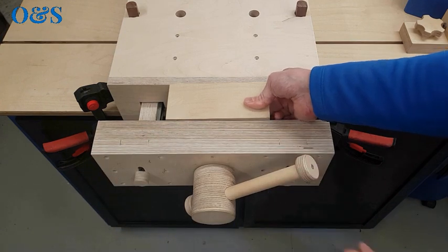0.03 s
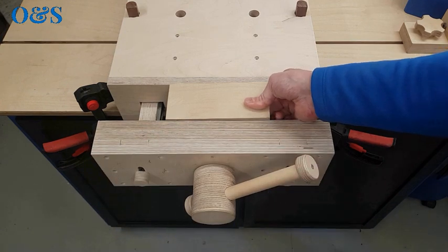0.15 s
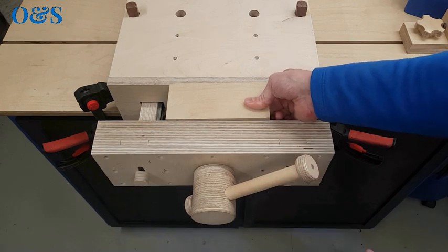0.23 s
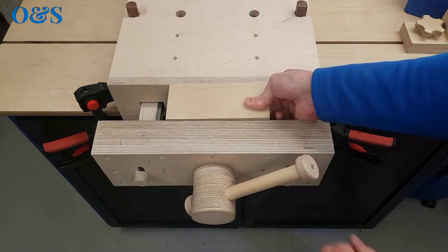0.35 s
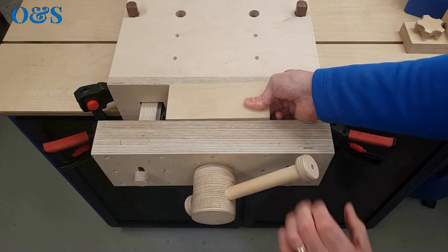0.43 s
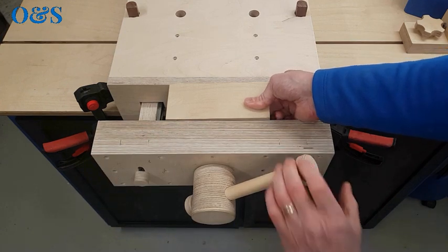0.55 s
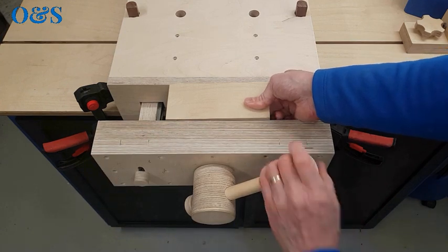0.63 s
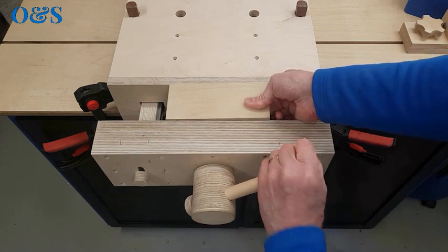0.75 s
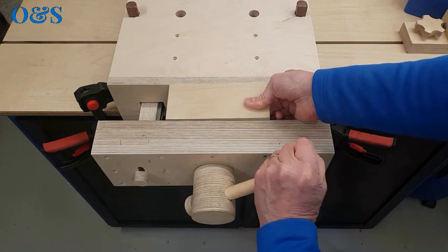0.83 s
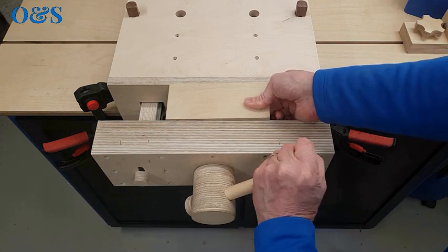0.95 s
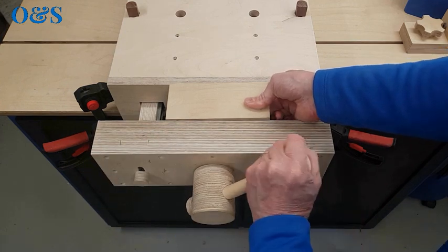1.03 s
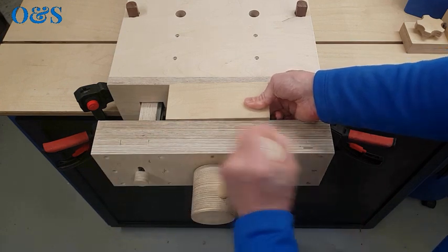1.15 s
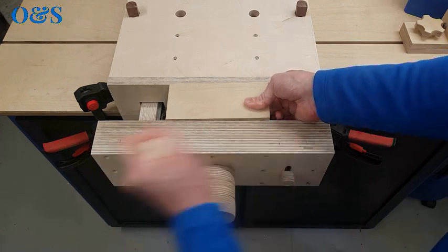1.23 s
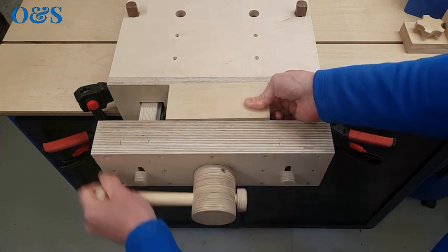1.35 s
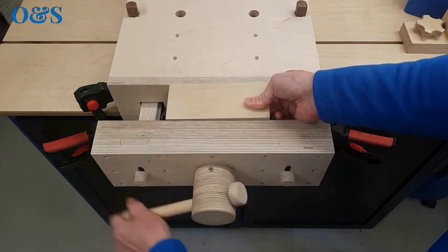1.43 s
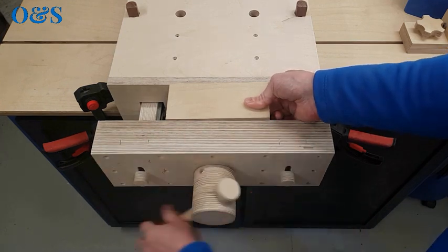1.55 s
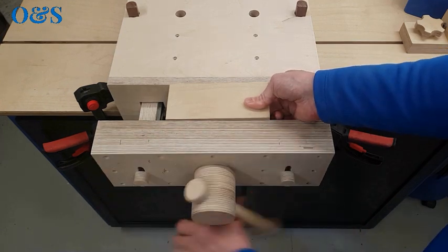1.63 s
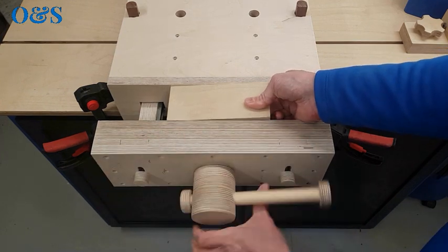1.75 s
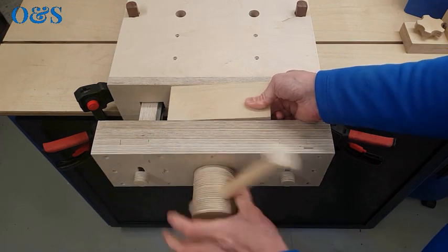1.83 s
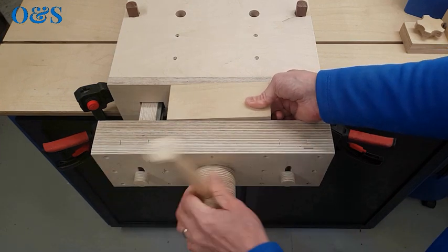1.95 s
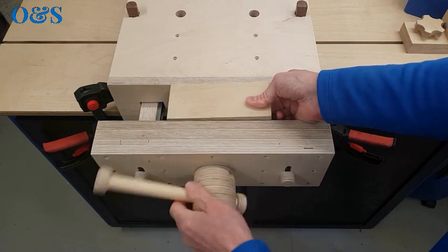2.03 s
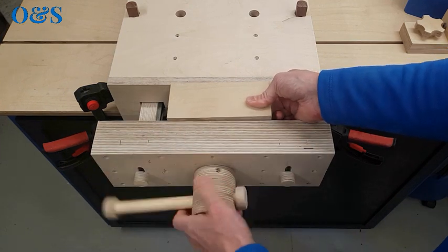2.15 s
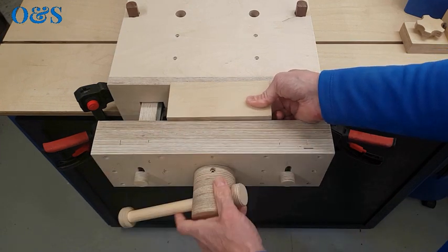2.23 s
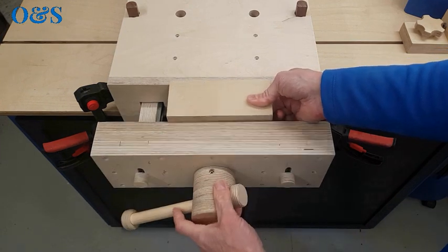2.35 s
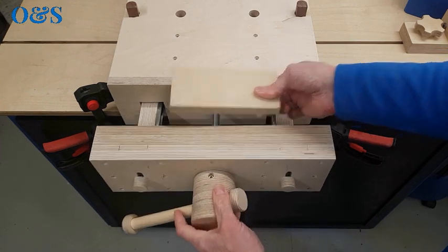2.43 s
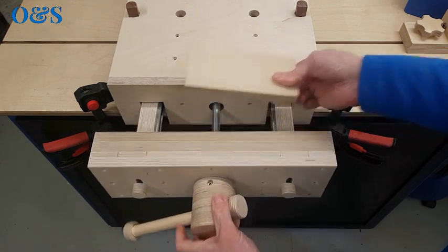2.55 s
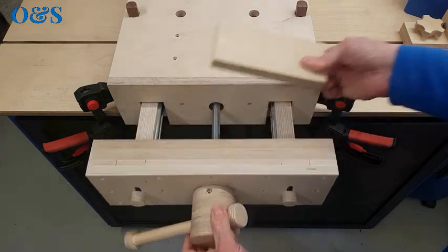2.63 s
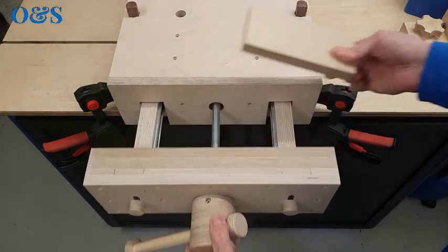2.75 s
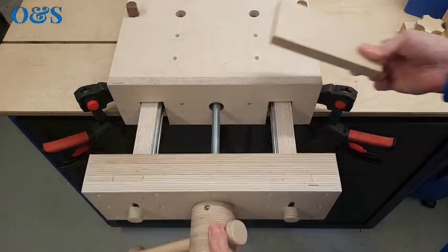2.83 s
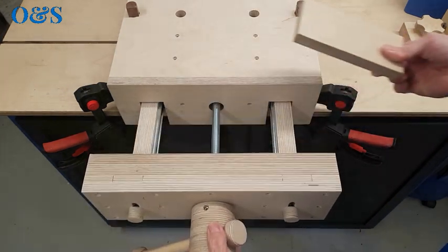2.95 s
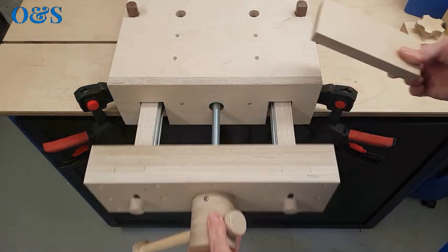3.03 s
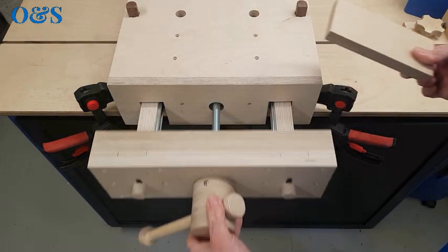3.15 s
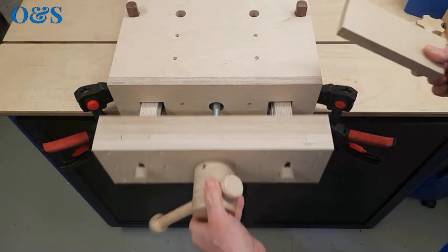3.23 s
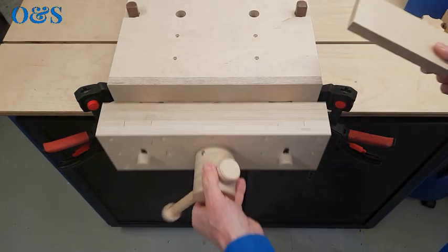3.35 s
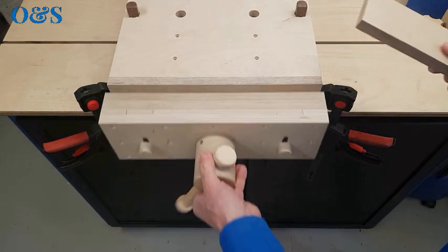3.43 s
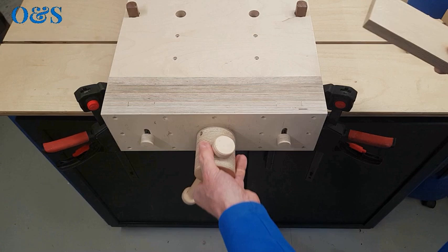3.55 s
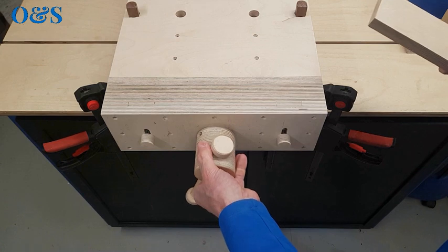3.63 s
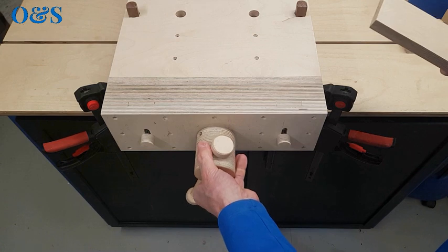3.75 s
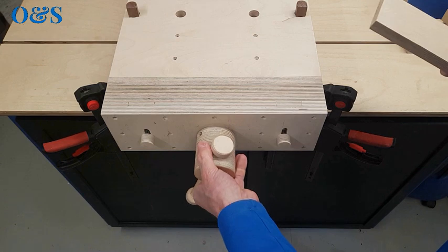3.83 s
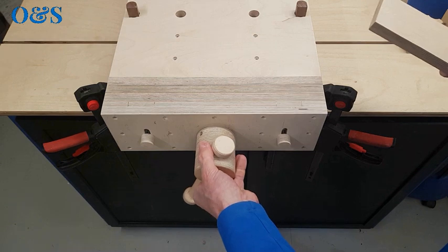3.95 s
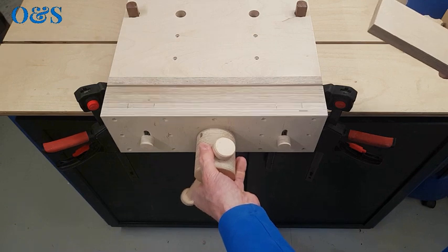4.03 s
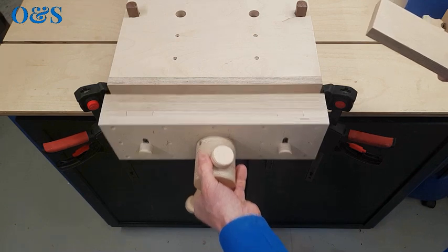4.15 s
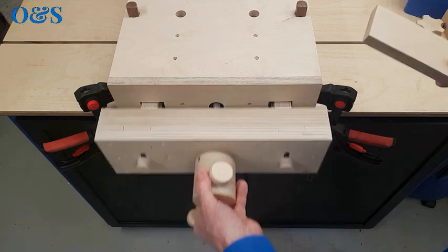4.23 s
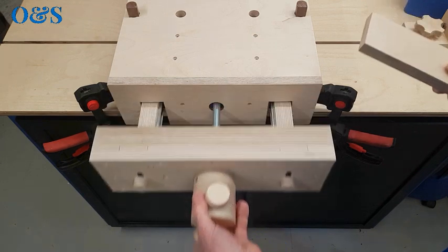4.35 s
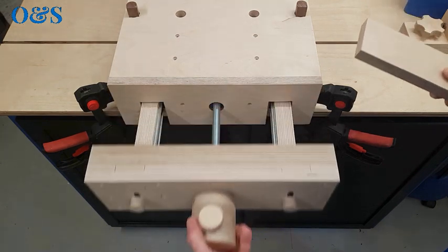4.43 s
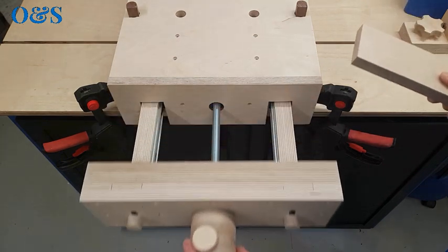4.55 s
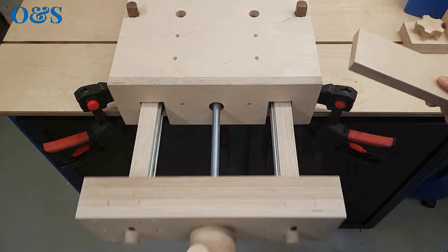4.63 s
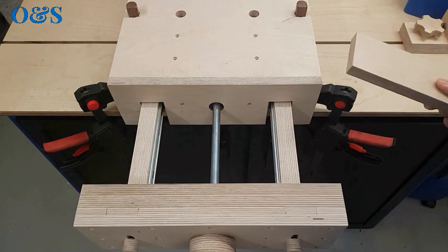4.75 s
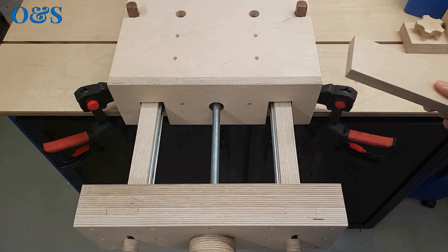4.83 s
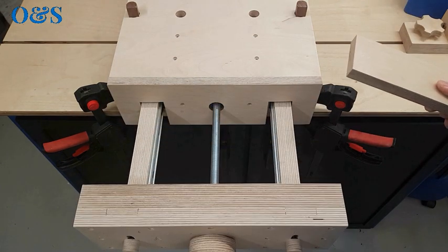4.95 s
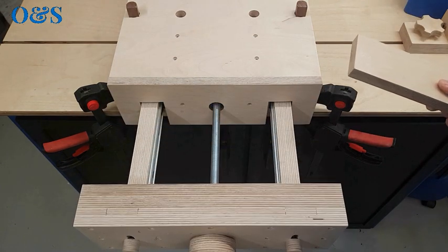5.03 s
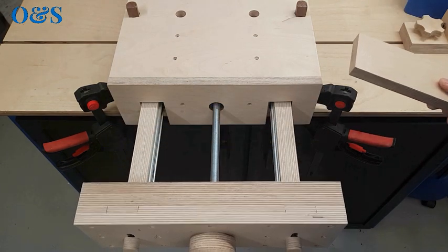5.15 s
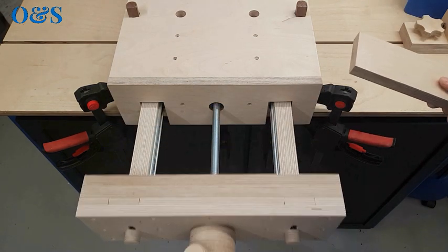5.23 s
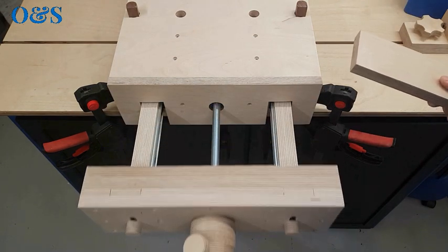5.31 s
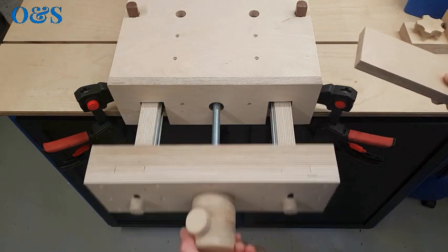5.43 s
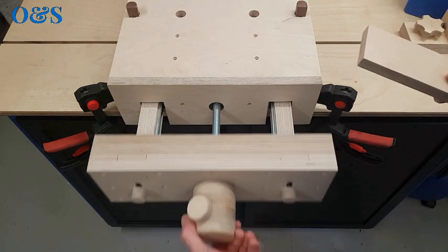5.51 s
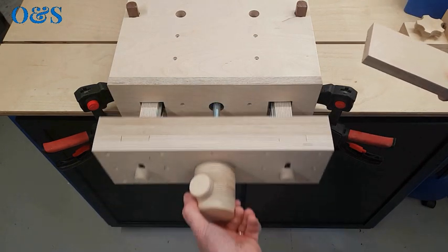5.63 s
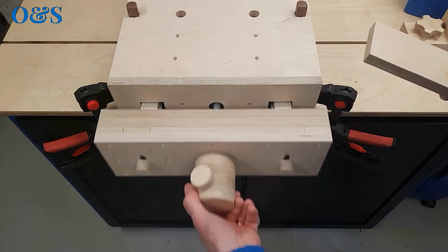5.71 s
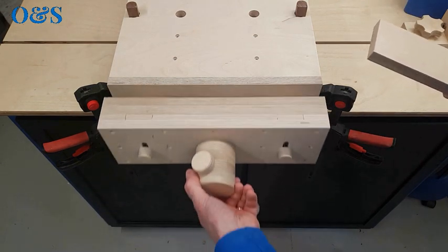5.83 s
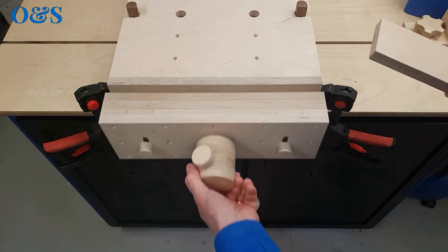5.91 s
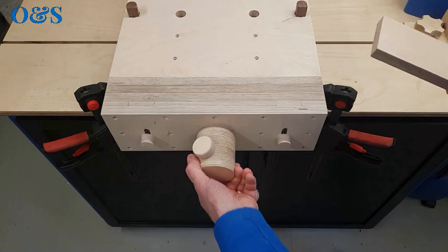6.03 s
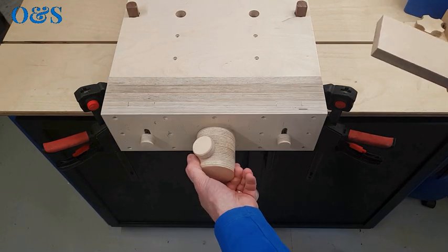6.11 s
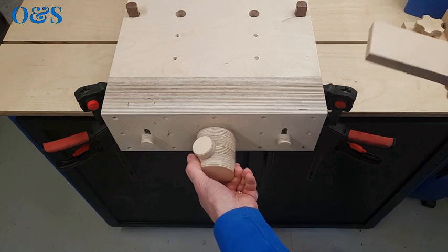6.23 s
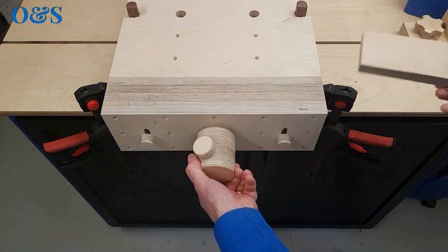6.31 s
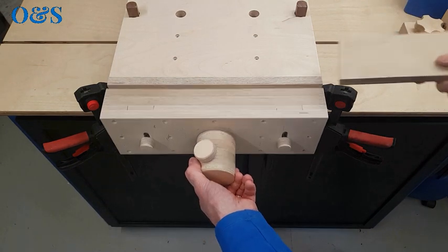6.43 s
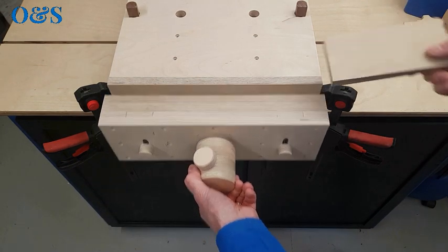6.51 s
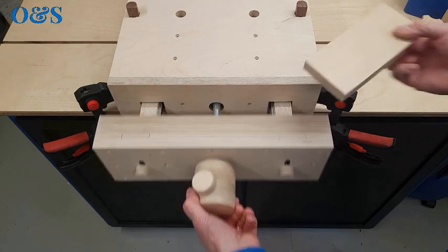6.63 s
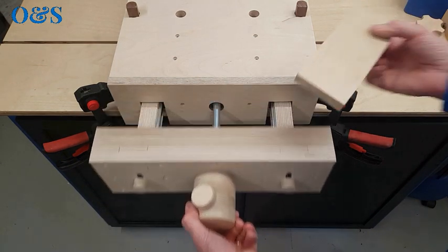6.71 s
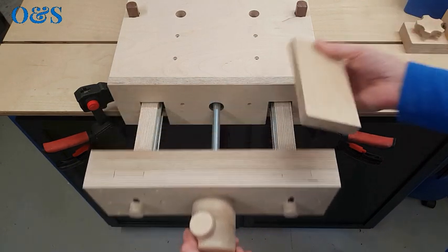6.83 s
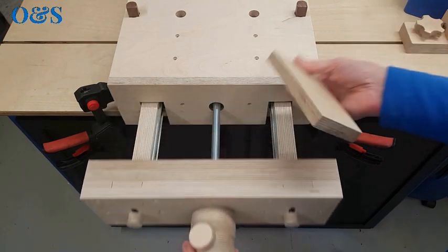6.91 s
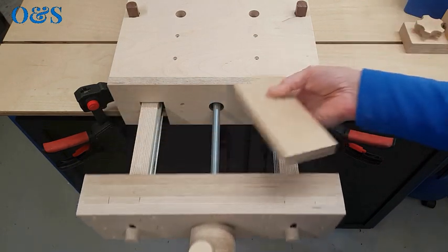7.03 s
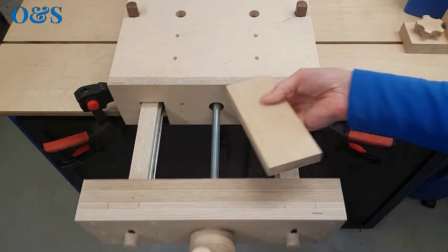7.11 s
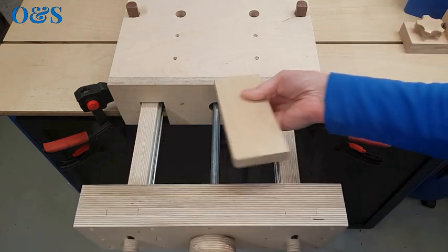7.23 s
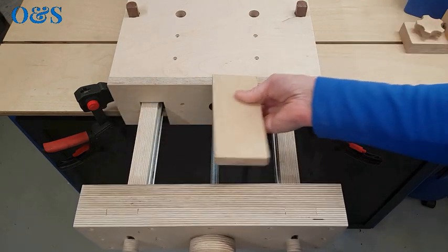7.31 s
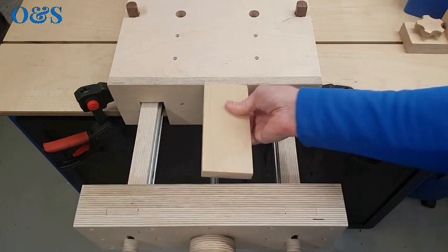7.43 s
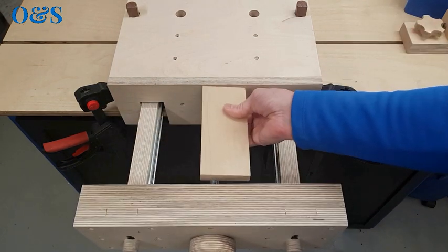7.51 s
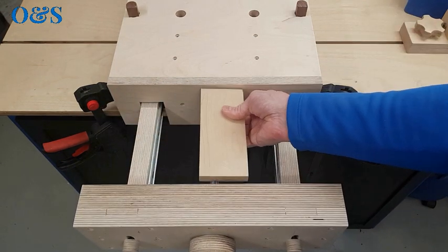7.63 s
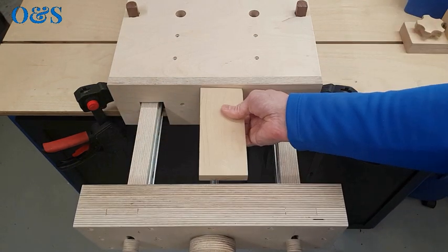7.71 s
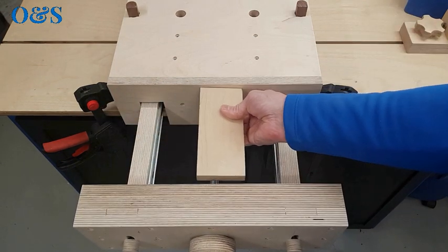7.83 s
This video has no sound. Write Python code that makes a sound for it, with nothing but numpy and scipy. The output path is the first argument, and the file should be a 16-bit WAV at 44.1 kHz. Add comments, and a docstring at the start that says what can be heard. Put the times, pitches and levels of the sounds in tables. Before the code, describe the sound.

Light clatter of a wooden handle, then a vise jaw scraping along wooden rails and clunking against its stops.

```python
"""A quiet workshop, where a plywood bench vise is worked by hand close under a stereo microphone.
The handle rattles round, the jaw bangs against its stops and a block is set down between the jaws:
each impact excites damped modes of the wood. Sliding on its wooden rails, the jaw is driven by
stick-slip friction. The small room reverberates; hands brush, and faint whistles sound over the air."""
import sys
import numpy as np
from scipy import signal
from scipy.fft import rfft, irfft, next_fast_len
from scipy.io import wavfile
from scipy.ndimage import uniform_filter1d

SR = 44100
rng = np.random.default_rng(int(sys.argv[2]) if len(sys.argv) > 2 else 0)


def wrap_up_sound(samples):
    """Save the sound to the file named by the first command line argument, as 16-bit audio."""
    columns = np.atleast_2d(samples).T
    # keep every value between -1 and 1, then stretch to whole-number steps
    tamed = np.clip(columns, -1, 1)
    steps = np.round(tamed * 32767).astype(np.int16)
    wavfile.write(sys.argv[1], SR, steps)


N = 347067

# Normal modes of the vise and bench: frequency_hz, level_db, t60_s
VISE_MODES = [(33.6, -18, 0.18), (56, -16, 0.58), (83.1, -12.5, 0.66), (107, -5.5, 0.17), (104, -9.5, 0.36),
              (160.8, -0.5, 0.094), (265, -1, 0.2), (273.3, -11, 0.24), (354.3, 3.5, 0.18),
              (421.7, 5, 0.082), (517.4, 2.5, 0.029), (603, 3, 0.081), (677, 1.5, 0.08), (670, -2, 0.045),
              (750, -7.5, 0.017), (838, -7, 0.09), (884, -7.5, 0.079), (1080, -26, 0.062),
              (1217, -5.5, 0.076), (1289, -16.5, 0.25), (1640, -25.5, 0.052)]
# Likeness of left and right in the hiss: frequency_hz, coherence
HISS_COHERENCE = [(60, 0.073), (240, 0.21), (950, 0.19), (3770, 0.03), (15000, 1)]
# Strokes of wood on wood; a nearly shut jaw rings lower: scrape_db, rasp_db, rumble_db, from_hz, to_hz,
# glide_middle_s, effort as (time_s, level_db)
STROKES = [(-2, 0.5, -29, 369, 280, 0.34, [(0, -73), (.12, -68), (.22, -82), (.5, -101)]),
           (-0.5, 8.7, 0.5, 314, 380, 1.76, [(1.4, -87), (1.5, -64.5), (1.56, -57), (1.63, -52),
           (1.7, -64.5), (1.82, -99)]), (-6.5, 0.1, -5.5, 324, 335, 2.85, [(2.55, -99), (2.69, -64),
           (2.85, -60.5), (3, -50), (3.13, -54.5), (3.28, -82)]),
           (-6, 0.1, -8.5, 450, 306, 3.44, [(3.28, -75), (3.38, -50), (3.5, -40), (3.66, -45.5),
           (3.77, -46.5), (3.89, -52)]), (-2.5, 0.09, -18, 218, 333, 4.5, [(4.33, -99.5), (4.43, -59.5),
           (4.46, -56.5), (4.53, -45), (4.57, -44.5), (4.65, -44.5), (4.74, -43), (4.89, -52.5),
           (4.96, -56.5), (5.05, -42.5)]), (-7.5, 3, -18.5, 338, 305, 6.18, [(5.25, -79.5), (5.55, -66),
           (5.63, -56.5), (5.69, -52.5), (5.79, -49.5), (5.84, -43.5), (5.875, -50.5), (5.905, -44),
           (5.95, -49), (6.06, -50.5), (6.09, -50.5), (6.27, -65), (6.39, -57.5)]),
           (-7, 0.7, -7.5, 299, 337, 6.99, [(6.68, -86), (6.8, -59), (6.84, -49.5), (6.91, -50.5),
           (6.96, -43.5), (6.99, -51), (7.045, -40), (7.13, -45.5), (7.18, -48.5), (7.25, -51.5),
           (7.3, -52.5), (7.5, -84.5)])]
# Impacts of each kind: start_s, body_db, thud_db, clack_db, crack_db, tick_db, low_note_db,
# upper_notes_db, ring_factor, pan_db. The levels from thud to upper notes are offsets on the body level.
HANDLE_GRIPPED = [(0.84, -45, -7, 10.5, -10, -61, -6, -3, 1, -0.5),
                  (0.98, -53.5, -16, 7.5, -25, -13, -11, -7, 1, -2),
                  (1.075, -52.5, -14, -12, -8, -17, 4, -10, 0.47, 1),
                  (1.132, -50.5, -16, 4, 5, -7, -1, 13.5, 0.31, 0),
                  (1.319, -48.5, -39, -35, -2, -20, -1, -3, 0.65, -1)]
HANDLE_SWUNG = [(1.946, -55.5, -3, -11, -10, -30, 3, -5, 1, 0),
                (2.191, -39.5, -10.5, -7, -7.5, -53, 10, 8.5, 0.76, -1.5),
                (2.303, -56.5, -7.5, -18, 1.5, -55, -14, -10, 0.98, 3),
                (2.431, -42.5, -26, -27, -22, -33, -1, -23, 0.29, -6)]
HANDLE_DROPS = [(2.024, -38.5, -5, -5, -13, -29, 4.6, 4.6, 0.51, 0.86),
                (2.042, -36.5, 1.5, -23, -6.5, -36, 8.2, 1.4, 0.71, 1.8)]
JAW_CATCHES = [(2.86, -49.5, -33, 6, -11.5, -37, -5, -6, 0.91, 1),
               (3.352, -40.5, -19, -14, -33, -48, -11, 3, 0.47, 1),
               (3.508, -36.5, -34, -8, -25, -36, -4, 13, 0.62, -0.56),
               (3.576, -26, -25.5, -6.5, -33, -47, 10, 13, 0.18, 1),
               (3.647, -38, -16, -4, -29, -26, 8, 5.5, 1, 1),
               (4.448, -41, -11.5, 13, -38, -33.5, -16, -5, 0.18, -1.8),
               (4.479, -34, -19, 3, -7.5, -52, -13, -10, 0.67, -1),
               (4.654, -35.5, -15, -1.5, 6, -42, -15, 1, 0.23, .5)]
JAW_SHUTS = [(3.8765, -12, -13, 4, -5, -30, -9.5, -8, 0.38, -0.87),
             (3.883, -9, -8.5, -0.5, -10, -33, 11.5, -2.5, 0.62, -1),
             (6.3718, -22, -38, -2, -2, -19, -9, 6, 0.45, -1.3),
             (6.377, -22, -15.5, 9, -2.5, -26, 10.5, 5, 0.75, -1.1)]
JAW_STOPS = [(5.038, -18, -12.5, -8, -3, -19.5, 12.4, -11, 0.74, -1)]
BLOCK_TAPS = [(7.278, -38, -15.5, -21, -15, -22, 2, -2.9, 0.91, -2),
              (7.395, -37.5, -17, -18.5, -7.5, -28.5, 11, 0.45, 0.69, -1.5)]
BLOCK_LANDS = [(7.532, -11, -12.5, -34, -19.5, -41.5, 6.2, -12.5, 0.67, 0.68)]


def gain_of(db):
    """Amplitude ratio of a level in decibels."""
    return 10 ** (np.asarray(db) / 20)


def unit_rms(x):
    """Normalisation to a mean power of 1."""
    return x / np.sqrt(np.mean(x ** 2) + 1e-20)


def value_at(points, hz):
    """Interpolation of a spectrum on a log-frequency axis."""
    f, value = np.transpose(points)
    return np.interp(np.log(hz + 1), np.log(f + 1), value)


def add(mix, start_s, sound):
    """Superposition of a sound on the mix."""
    part = mix[..., round(start_s * SR):][..., :sound.shape[-1]]
    part += sound[..., :part.shape[-1]]


def sampled(points):
    """Linear interpolation in time: the start and the value at every sample."""
    times, values = np.transpose(points)
    return times[0], np.interp(np.arange(times[0], times[-1], 1 / SR), times, values)


def drift(length, span):
    """Slow fluctuation: a moving average of noise over span samples, at rms 1."""
    return unit_rms(uniform_filter1d(rng.standard_normal(length), span))


def coloured(x, spectrum):
    """Spectral shaping of x, at rms 1."""
    hz = np.fft.rfftfreq(len(x), 1 / SR)
    return unit_rms(irfft(rfft(x) * gain_of(value_at(spectrum, hz)), len(x)))


def resonate(x, hz, width_hz):
    """Resonance of gain 1 by heterodyning: shift hz down to zero, smooth, and shift back."""
    carrier = np.exp(2j * np.pi * np.cumsum(hz * np.ones(len(x))) / SR)
    pole = np.exp(-np.pi * width_hz / SR)
    return 2 * (carrier * signal.lfilter([1 - pole], [1, -pole], x / carrier)).real


def stereo_pair(a, b, coherence):
    """Partial coherence: left and right mixed from two independent spectra."""
    return np.array([a, coherence * a + np.sqrt(1 - coherence ** 2) * b])


def hiss(spectrum, coherence, patchy_db):
    """Random-phase stereo noise whose spectrum fluctuates in drifting patches, at rms 1."""
    frames, hz = N // 256 + 5, np.fft.rfftfreq(1024, 1 / SR)
    a, b, c, d, patches = rng.standard_normal((frames, 513, 5)).T
    patches = unit_rms(uniform_filter1d(uniform_filter1d(patches, 12, 0), 12, 1))
    bands = stereo_pair(a + 1j * b, c + 1j * d, value_at(coherence, hz)[:, None])
    bands *= gain_of(value_at(spectrum, hz)[:, None] + patchy_db * patches)
    return unit_rms(signal.istft(bands, nperseg=1024, noverlap=768)[1][:, :N])


def still_air():
    """Ambient noise floor: steady, broadband and strongest in the bass."""
    # Spectral density of the air: frequency_hz, relative_db
    spectrum = [(15, 3.5), (35, -19), (55, -14.5), (90, -0.5), (250, -9.5), (385, -3), (600, -13),
                (1000, -15.5), (1900, -15), (3000, -21.5), (6500, -31), (10000, -32.5), (15000, -24.5)]
    return gain_of(-67.5) * hiss(spectrum, HISS_COHERENCE, patchy_db=.9)


def whistles():
    """Faint thin tones with random frequency and amplitude modulation."""
    # One pitch contour for each whistle: time_s, pitch_hz
    contours = [
        [(5.262, 4500), (5.285, 4720), (5.34, 4480), (5.365, 4720)],
        [(5.455, 4750), (5.5, 4400), (5.57, 4250), (5.7, 4380), (5.75, 4560), (5.79, 4220), (5.87, 4370),
         (5.91, 4600)],
        [(2.05, 7500), (2.11, 7450)],
        [(2.21, 7550), (2.26, 7500)],
        [(2.5, 7350), (2.58, 7550), (2.7, 7500)],
        [(2.82, 7400), (2.87, 7400)],
        [(7.16, 4750), (7.22, 4700)],
    ]
    mix = np.zeros(N)
    for contour in contours:
        start_s, hz = sampled(contour)
        wavering_hz = uniform_filter1d(hz, 600) + .008 * hz * drift(len(hz), 300)
        tone = np.sin(2 * np.pi * np.cumsum(wavering_hz) / SR)
        level_db = -81.5 - 1.5 * (hz - 4500) / 1000 + 3 * drift(len(hz), 900)
        add(mix, start_s, gain_of(level_db) * tone * signal.windows.tukey(len(hz), .2))
    return mix


def rustle():
    """Amplitude-modulated hiss: brushing hands, the fizz of strokes and treble lingering after knocks."""
    # Spectral density of the rustle: frequency_hz, relative_db
    spectrum = [(1500, -9), (3000, 7.5), (4250, 1), (4650, 6), (5050, -0.5), (6700, -5.5), (7500, 1),
                (8500, -2), (15000, -2.5)]
    # Hands and sleeves brushing: peak_s, level_db, rise_db_per_s, fall_db_per_s
    brushes = [(0.06, -73, 10, 76), (0.891, -69.5, 238, 121), (1.01, -77, 206, 76),
               (1.33, -103, 502.5, 100), (1.619, -62.5, 155, 127), (2.035, -67.5, 515, 152),
               (2.45, -78, 5, 36), (7.17, -69.5, 34, 41)]
    fizz_db, fizz_follows = -54.5, 0.43
    linger_db, linger_db_per_s = -55.5, 67
    t = np.arange(N) / SR
    envelope = sum(gain_of(db - np.where(t < peak_s, rise * (peak_s - t), fall * (t - peak_s)))
                   for peak_s, db, rise, fall in brushes)
    for *_, effort in STROKES:
        start_s, level_db = sampled(effort)
        add(envelope, start_s, gain_of(fizz_db + fizz_follows * level_db))
    for start_s, body_db, *_ in JAW_SHUTS + JAW_STOPS + BLOCK_TAPS + BLOCK_LANDS:
        add(envelope, start_s, gain_of(body_db + linger_db - linger_db_per_s * t[:SR]))
    return envelope * hiss(spectrum, HISS_COHERENCE, patchy_db=1.2)


def room(x):
    """Reverberation: convolution with sparse reflections, each band decaying at its own rate."""
    # Reverberation time: frequency_hz, t60_s
    decay = [(60, 0.61), (250, 0.28), (600, 0.33), (1200, 0.31), (3000, 0.27), (8000, 0.32)]
    # Likeness of the echoes at left and right: frequency_hz, coherence
    coherence = [(100, 0.81), (300, 1), (500, .3), (900, 0.9), (2000, 0.15), (6000, 0.15), (12000, 0.62)]
    build_up_s = .012
    taps = np.zeros((2, SR))
    arrivals = np.arange(150, SR - 20, 20) + rng.integers(0, 20, (2, (SR - 151) // 20))
    np.put_along_axis(taps, arrivals, rng.choice([-1., 1.], arrivals.shape), 1)
    hz, t, bands = signal.stft(taps, SR, nperseg=512)
    envelope = gain_of(-60 * t / value_at(decay, hz)[:, None]) * (1 - np.exp(-(t / build_up_s) ** 2))
    bands = stereo_pair(*bands, value_at(coherence, hz)[:, None]) * envelope
    # Each band takes the energy of its envelope, so no pitch stands out.
    bands *= (np.linalg.norm(envelope, axis=-1) / np.linalg.norm(bands, axis=-1))[..., None]
    bands *= (hz ** 2 / (hz ** 2 + 170 ** 2))[:, None]  # the echoes carry little bass
    tail = signal.istft(bands, SR, nperseg=512)[1]
    return signal.fftconvolve(x[None], tail / np.linalg.norm(tail[0]), axes=1)[:, :N]


def diffused(sound):
    """Diffusion: the walls receive a knock from all sides as a short puff, its notes run together."""
    blur_hz = 220
    power = uniform_filter1d(abs(rfft(sound)) ** 2, round(blur_hz * len(sound) / SR))
    pulse = irfft(np.sqrt(power), len(sound))
    return np.roll(pulse, 400)[:800] * np.hanning(800)


def microphone_ports(x):
    """Phase difference between the two ports; the lowest bass is filtered out."""
    # Lag of the right port behind the left: frequency_hz, phase_rad
    lag = [(300, 0.14), (1100, 1.33), (2100, 1.19), (2600, -0.5), (3500, -0.5), (4300, 6), (5500, 5),
           (5900, -15), (7000, 6.5)]
    size = next_fast_len(N)
    rotation = np.exp(-1j * value_at(lag, np.fft.rfftfreq(size, 1 / SR)) * [[0], [1]])
    high_passed = signal.sosfilt(signal.butter(2, 38, "high", fs=SR, output="sos"), x)
    return irfft(rfft(high_passed, size) * rotation, size)[:, :N]


def stroke(scrape_db, rasp_db, rumble_db, from_hz, to_hz, glide_middle_s, effort):
    """Stick-slip friction: uneven slips and fine grain drive the jaw's resonance and the vise's modes."""
    # Spectral density of wood dragged over wood: frequency_hz, relative_db
    spectrum = [(250, -37), (420, 3), (590, -3), (850, -10.5), (1180, -10.5), (1700, -15), (2600, -23),
                (3300, -32.5), (5000, -39.5), (9000, -58)]
    slips_per_s, glide_s, judder_db, scrape_follows = 220, 0.03, 2.5, 0.78
    start_s, level_db = sampled(effort)
    length, peak_db = len(level_db), level_db.max()
    t = start_s + np.arange(length) / SR
    swell_db = level_db - peak_db + judder_db * drift(length, 1500)  # the grip is uneven
    jaw_hz = from_hz + (to_hz - from_hz) / (1 + np.exp((glide_middle_s - t) / glide_s))
    slipping = rng.random(length) < slips_per_s / SR
    slip_size = gain_of(4.2 * np.minimum(rng.exponential(1, length), 3))
    grain = rng.standard_normal(length)
    force = 0.51 * unit_rms(slipping * slip_size * np.sign(grain)) + 0.87 * grain
    jaw = resonate(resonate(force, jaw_hz, 36), jaw_hz, 120)
    bench_top = resonate(resonate(force, 277.3, 37), 274.3, 170)
    coupling = 1.6 * np.exp((272 - jaw_hz) / 60)  # the lower the jaw rings, the more it drives the bench
    drag = coloured(force, [(f, db + value_at([(600, 0), (2200, rasp_db)], f)) for f, db in spectrum])
    scrape = drag + 0.17 * sum(resonate(drag, hz, 11 / t60) for hz, _, t60 in VISE_MODES if hz > 450)
    rumble = sum(gain_of(db) * resonate(resonate(force, hz, 5 / t60), hz, 70) * np.sqrt(t60)
                 for hz, db, t60 in VISE_MODES if hz < 210)
    sound = (gain_of(swell_db) * unit_rms(jaw + coupling * bench_top)
             + gain_of(scrape_db + scrape_follows * swell_db) * unit_rms(scrape)
             + gain_of(rumble_db + swell_db) * unit_rms(rumble))
    return start_s, gain_of(peak_db) * sound * signal.windows.tukey(length, .05)


def knock(body_db, thud_db, clack_db, crack_db, tick_db, low_db, upper_db, ring_factor, pan_db,
          rise_ms, note_t60_s, looseness, low_hz, upper_notes):
    """Impact excitation: damped modes of the vise and its pieces swell and decay over a dry crack."""
    # Centres of thud, body, clack and crack: frequency_hz
    colour_hz = [120, 310, 800, 2500]
    # Plywood modes crowded into a dry noise: frequency_hz, relative_db
    dense_modes = [(250, -26.5), (450, 0.5), (700, -4), (1000, -4), (1600, -8.5), (2300, -16),
                   (3200, -20.5), (5000, -24.5), (8000, -33.5), (15000, -56)]
    t = np.arange(SR // 2) / SR
    mode_hz, mode_db, mode_t60 = np.transpose(VISE_MODES)[:, :, None]
    notes = [(low_hz, low_db)] + [(f, level + upper_db) for f, level in upper_notes]
    note_hz, note_db = np.transpose(notes)[:, :, None]
    colour = list(zip(colour_hz, [thud_db + 15, 0, clack_db, crack_db]))
    hz = np.vstack([mode_hz, note_hz])
    db = np.vstack([mode_db + value_at(colour, mode_hz), note_db])
    t60 = ring_factor * np.vstack([mode_t60, note_t60_s * (600 / note_hz) ** 0.11])
    # Loose parts keep chattering, so each mode wanders in phase, the high ones most.
    walk = np.cumsum(rng.standard_normal((len(hz), len(t) // 32 + 1)), axis=1)
    chatter = uniform_filter1d(walk.repeat(32, axis=1)[:, :len(t)], 64)
    phase = 2 * np.pi * (hz * t + rng.random((len(hz), 1))) + looseness / 1000 * hz * chatter
    swell = 1 - np.exp(-(t * 1000 / (rise_ms + 600 / hz)) ** 0.9)  # heavy parts start more slowly
    ringing = (gain_of(db - 60 * t / t60) * swell * np.sin(phase)).sum(0)
    hardness = [(2500, 0.0077), (6000, tick_db - crack_db + 10)]  # a harder contact is brighter
    spectrum = [(f, level + value_at(hardness, f)) for f, level in dense_modes]
    noise = coloured(rng.standard_normal(len(t)), spectrum)
    crack = gain_of(crack_db + 6 - 60 * t / (0.12 * ring_factor)) * noise
    contact = 1 - np.exp(-(t * 1000 / (0.8 * rise_ms)) ** 2.6)
    return gain_of(body_db - 3.5) * (ringing + crack * contact) * gain_of([[pan_db / 2], [-pan_db / 2]])


def scene():
    """Superposition of direct sound, reverberation from three spots, whistles, rustle and still air."""
    # What impacts of a kind share: impacts, rise_ms, base_t60_s (of a 600 Hz note), looseness,
    # low_note_hz, upper notes as (pitch_hz, level_db)
    kinds = [(HANDLE_GRIPPED, 5.6, 0.15, 0.9, 170, [(605, 3), (2050, 0), (2420, -9)]),
             (HANDLE_DROPS, 2.4, 0.23, .3, 99, [(365, 3), (856, -2.5), (1310, -16), (1930, -3.5)]),
             (HANDLE_SWUNG, 3.1, 0.14, 0.61, 380, [(600, -5), (965, -0.5), (1160, -6), (1900, -12)]),
             (JAW_CATCHES, 6.3, 0.085, 0.82, 390, [(685, -11.5), (1100, -2), (1600, -6)]),
             (JAW_SHUTS, 1.44, 0.04, 1.66, 404, [(500, -2), (640, 10), (745, 1.5), (1015, -2.5),
             (1153, -11.5), (1420, -7), (1830, -15.5), (2440, -17)]),
             (JAW_STOPS, 3.4, 0.092, 1.11, 369, [(445, 11), (570, -18), (850, -7), (1590, 4)]),
             (BLOCK_LANDS, 4.3, 0.14, 0.78, 279, [(506, -1), (725, 3), (865, -4), (1630, -15)]),
             (BLOCK_TAPS, 2.6, 0.11, 0.64, 331, [(750, -15), (970, 2), (1750, 0.5), (2450, -11)])]
    knock_echo_db, stroke_echo_db = -4.5, -3.5
    direct, spots = np.zeros((2, N)), np.zeros((3, N))
    impacts = [row + tuple(shared) for rows, *shared in kinds for row in rows]
    for k, (start_s, *settings) in enumerate(impacts):
        sound = knock(*settings)
        add(direct, start_s, sound)
        add(spots[k % len(spots)], start_s, gain_of(knock_echo_db) * diffused(sound.mean(0)))
    for k, row in enumerate(STROKES):
        start_s, sound = stroke(*row)
        add(direct, start_s, sound)
        add(spots[k % len(spots)], start_s, gain_of(stroke_echo_db) * sound)
    tones = whistles()
    echoes = sum(room(spot) for spot in spots) * gain_of([[-.6], [.6]])
    return microphone_ports(direct + echoes) + tones + still_air() + rustle()


def record(dry):
    """Band limiting: a linear-phase low-pass filter removes the highest treble."""
    cutoff_hz = 15750
    low_pass = signal.firwin(511, cutoff_hz, window=("kaiser", 9), fs=SR)
    return signal.oaconvolve(dry, low_pass[None], "same")


dry = scene()
out = record(dry)
wrap_up_sound(out)
```